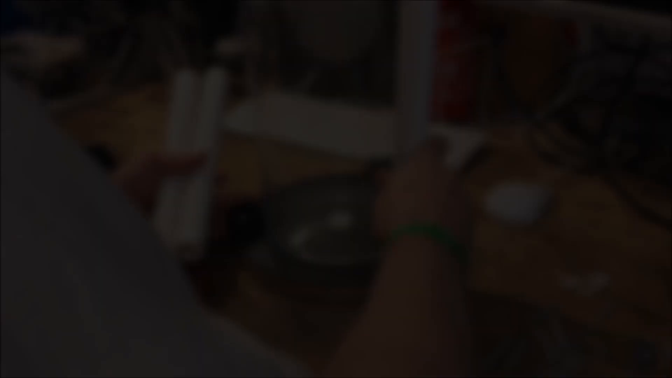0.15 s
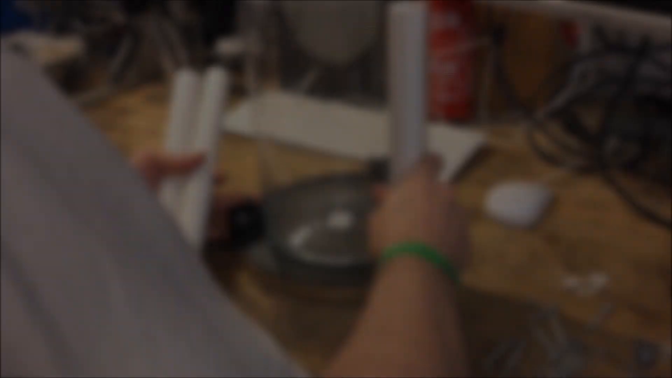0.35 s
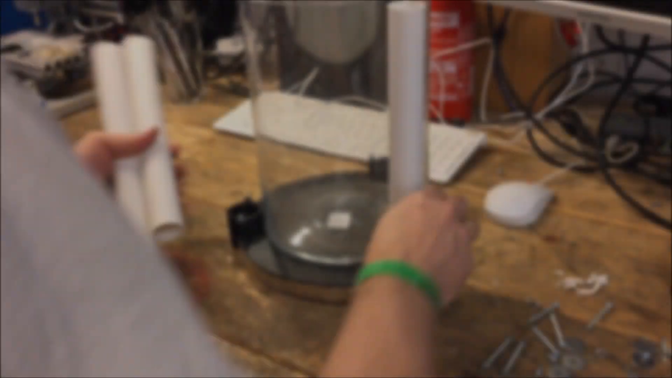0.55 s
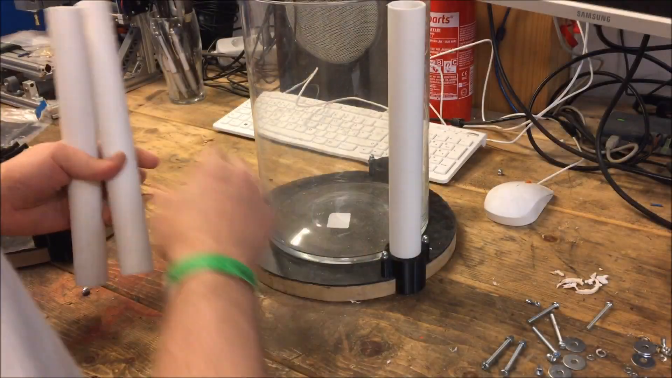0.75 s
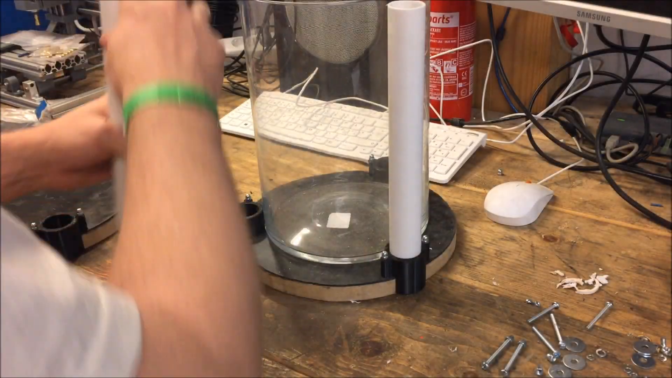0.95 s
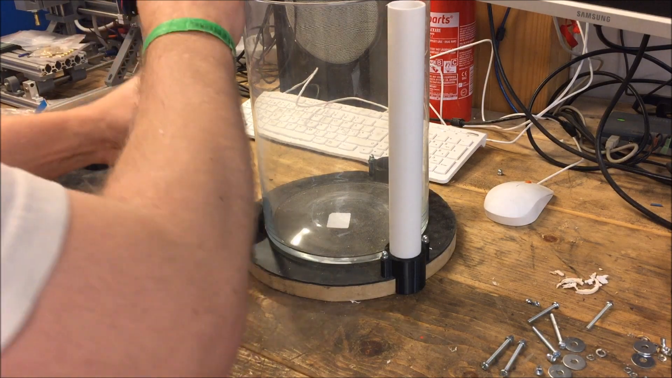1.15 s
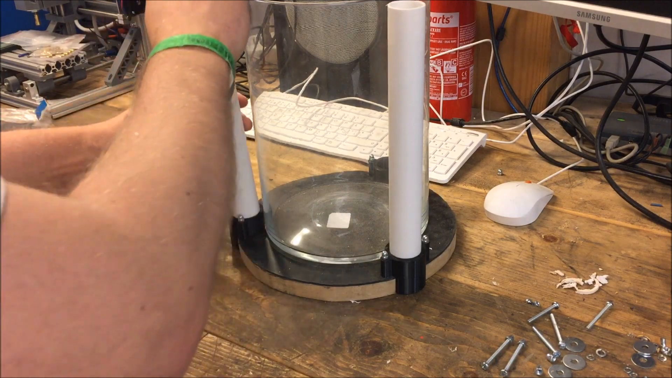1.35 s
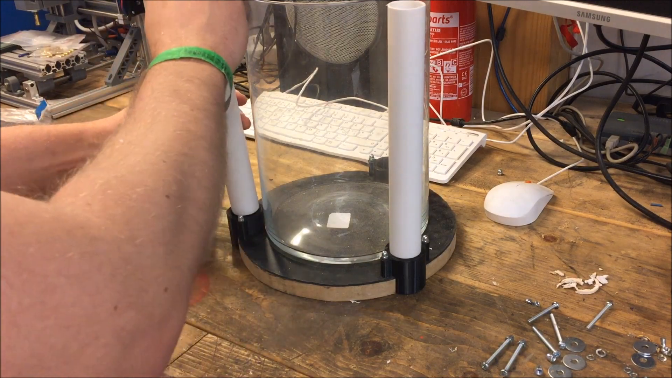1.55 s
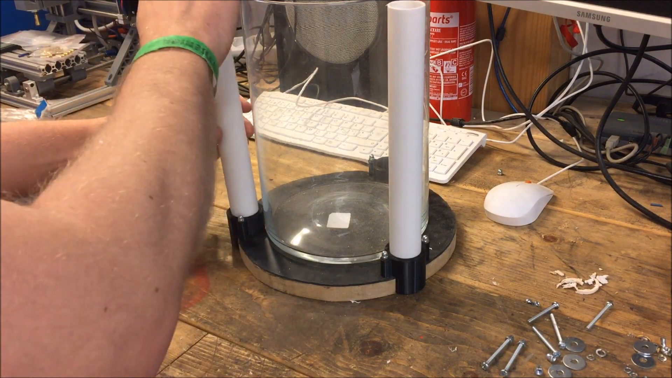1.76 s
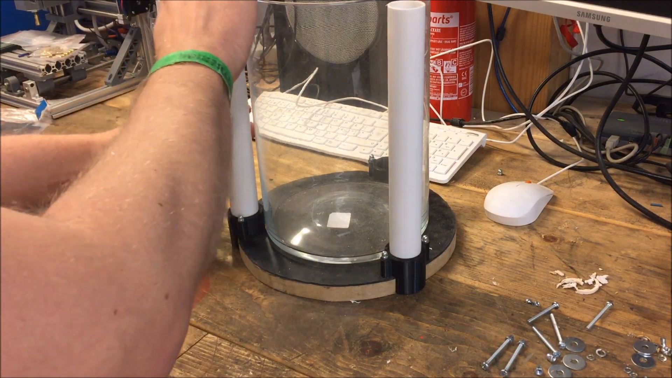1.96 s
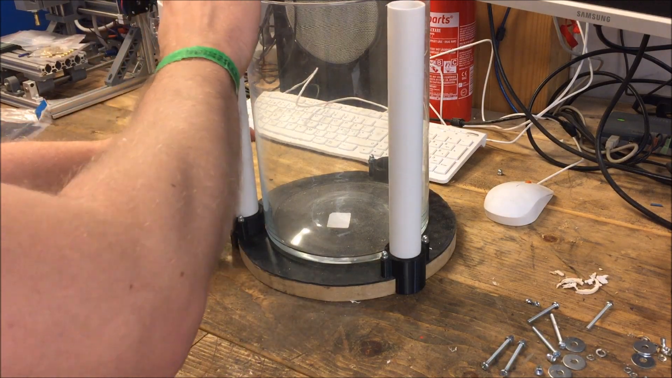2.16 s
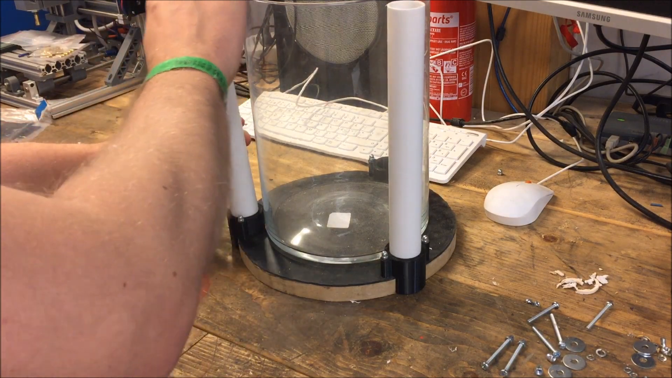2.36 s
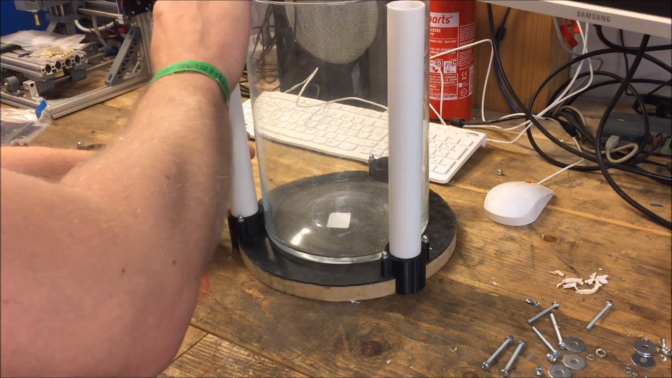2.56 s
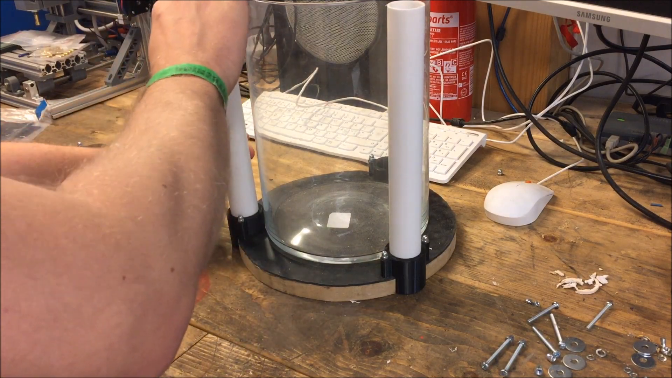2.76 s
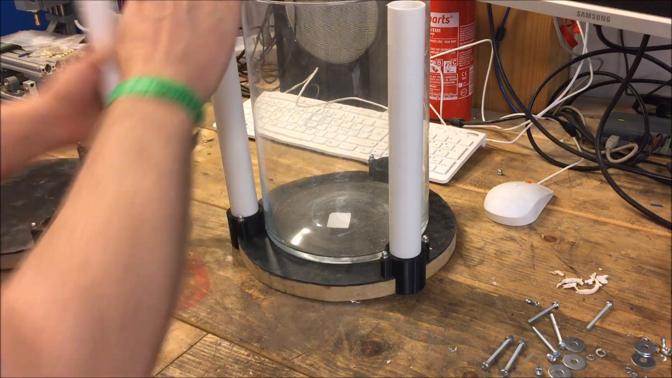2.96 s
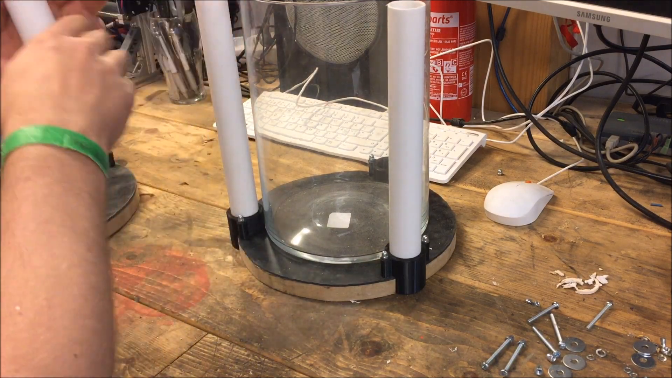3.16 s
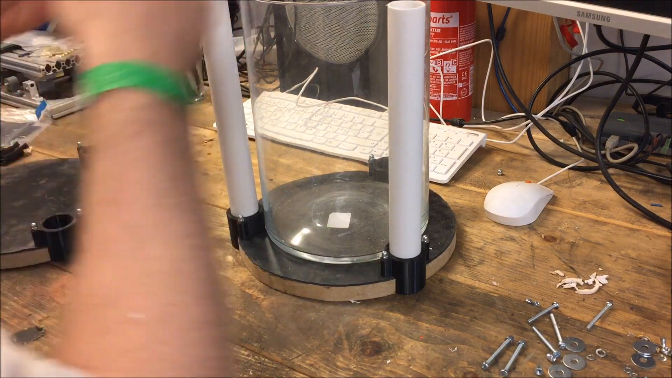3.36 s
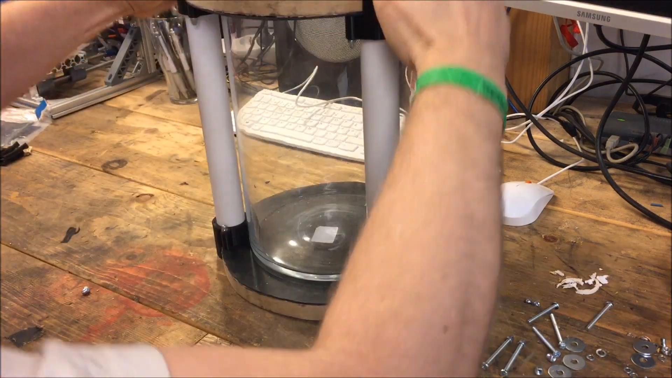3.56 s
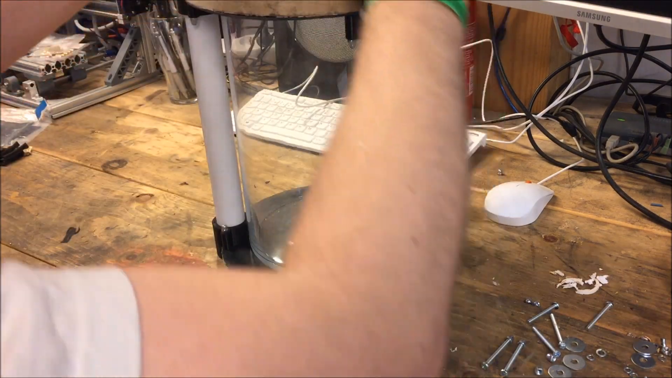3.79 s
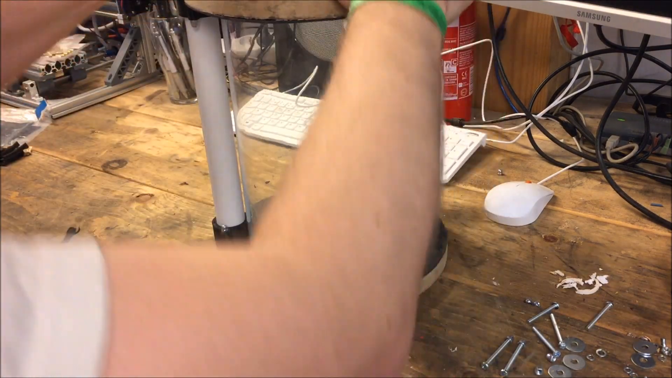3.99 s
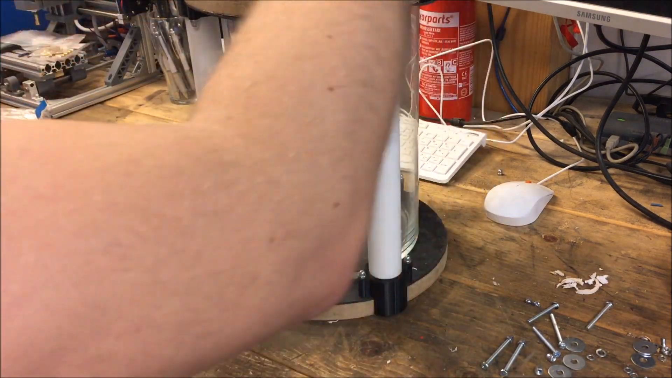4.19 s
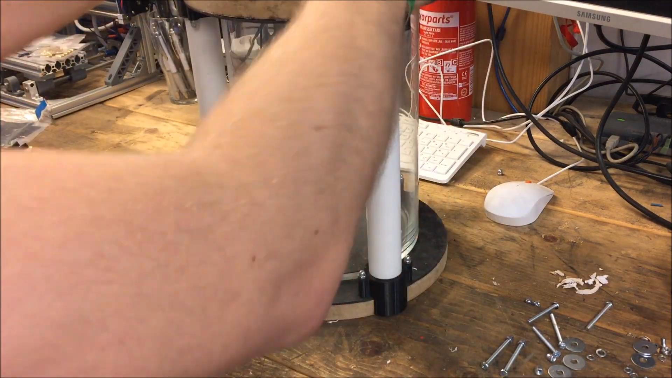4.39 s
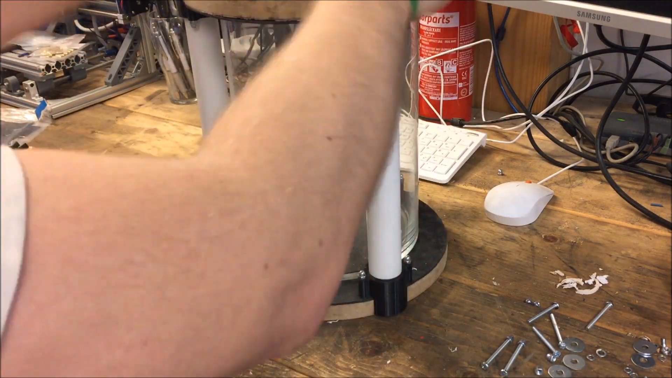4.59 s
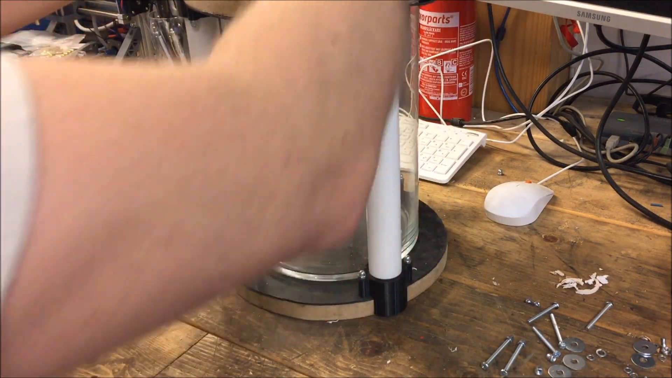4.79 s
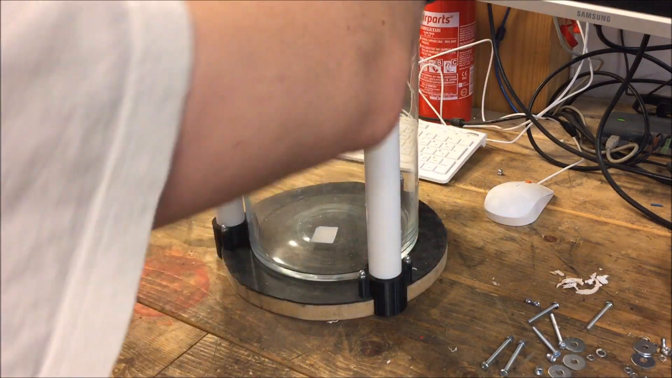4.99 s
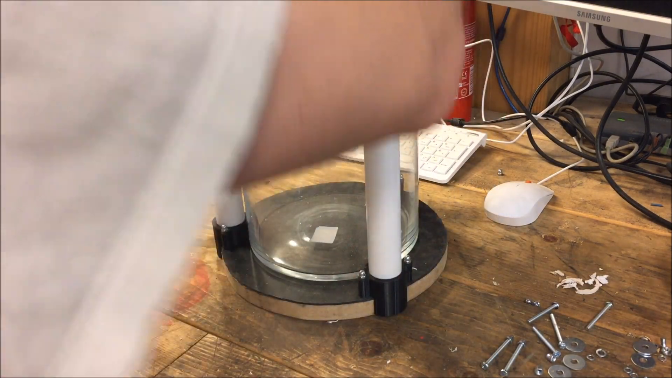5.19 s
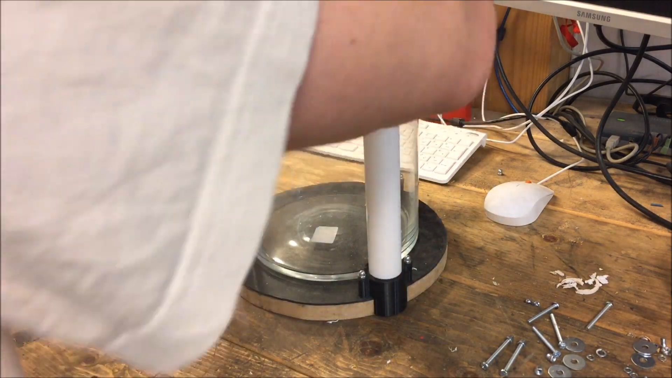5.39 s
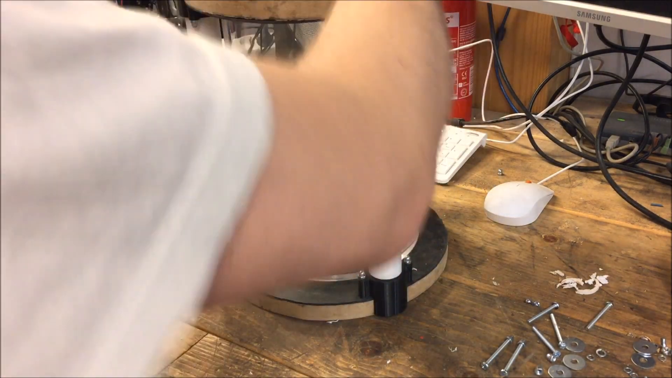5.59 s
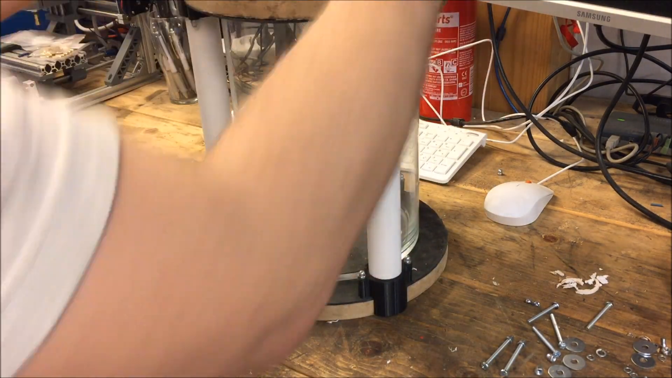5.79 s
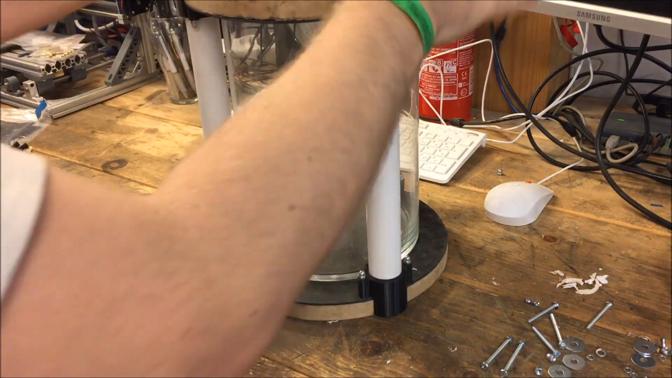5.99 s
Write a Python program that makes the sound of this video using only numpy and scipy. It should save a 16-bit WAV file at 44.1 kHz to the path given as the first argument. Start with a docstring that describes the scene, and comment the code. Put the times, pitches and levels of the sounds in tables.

```python
"""A small room with a fan running, the microphone near a workbench. Plastic pipes are pushed into
sockets on a round base that holds a glass tank; a wooden plate is then set on top and pressed home,
socket by socket. Each joint scrapes as it wedges in, snaps, and bottoms out with a knock that rings
the base or the plate; the bench booms under the shoves. In between, hands brush the plastic and
loose pipes click and ring."""
import sys
import numpy as np
from scipy import signal
from scipy.fft import rfft, irfft
from scipy.io import wavfile

SR = 44100
rng = np.random.default_rng(int(sys.argv[2]) if len(sys.argv) > 2 else 0)


def transcribe(signal):
    """Save signal, clipped to [-1, 1], as a 16-bit WAV file at the path in sys.argv[1]."""
    frames = np.atleast_2d(signal).T
    limited = np.clip(frames, -1, 1)
    pcm = np.round(limited * 32767).astype(np.int16)
    wavfile.write(sys.argv[1], SR, pcm)


N = 266319
RING_T = np.arange(int(.6 * SR)) / SR  # time axis of one ringing sound, in seconds


def amp(db):
    """Decibels to gain."""
    return 10 ** (np.asarray(db) / 20)


def unit(x):
    """Scales to rms 1."""
    return x / np.sqrt(np.mean(x ** 2) + 1e-20)


def read(points, hz):
    """Joins points by straight lines on a log-frequency axis."""
    point_hz, value = np.transpose(points)
    return np.interp(np.log(hz + 1), np.log(point_hz + 1), value)


def add(mix, start_s, sound):
    """Adds a sound to the mix at start_s."""
    part = mix[max(round(start_s * SR), 0):][:len(sound)]
    part += sound[:len(part)]


def cut(x, hz, kind, order=2):
    """Causal low-pass or high-pass."""
    return signal.sosfilt(signal.butter(order, min(hz, .47 * SR), kind, fs=SR, output="sos"), x)


def colour(x, spectrum):
    """Shapes a sound by a curve of (freq_hz, level_db) points."""
    gain = amp(read(spectrum, np.fft.rfftfreq(len(x), 1 / SR)))
    return irfft(rfft(x) * gain, len(x))


def drift(rate_hz):
    """Slow random wander of rms 1."""
    return unit(cut(rng.standard_normal(N), rate_hz, "low"))


def fade(t60_s):
    """Exponential decay, 60 dB down after t60_s."""
    return np.exp(-np.log(1000) * RING_T / t60_s)


def ring(modes):
    """Free vibration of a body: a blow starts all its modes together."""
    return sum(amp(db) * fade(t60) * np.cos(2 * np.pi * hz * RING_T) for hz, db, t60 in modes)


# Reflections off the bench top and shelves: delay_s, level_db
NEAR_ECHOES = [(.0023, -20), (.0041, -17), (.0068, -18), (.0097, -20), (0.017, -24)]
# Decay of the room: freq_hz, t60_s
ROOM_DECAY = [(80, 0.74), (250, 0.31), (700, 0.42), (2000, 0.43), (5000, 0.31), (9000, 0.32), (15000, 0.3)]
# What the walls return: freq_hz, level_db
WALL_COLOUR = [(60, 0.5), (150, 2.5), (400, -1), (1000, -2.5), (3000, -2), (7000, -9.5), (15000, -9.5)]
def room(x, tail_db, onset_s=0.0075):
    """Near surfaces answer the microphone first; then a diffuse tail dies band by band."""
    near = x.copy()
    for delay_s, db in NEAR_ECHOES:
        add(near, delay_s, amp(db) * x)
    hz, t, bands = signal.stft(rng.standard_normal(len(RING_T)), SR, nperseg=256)
    bands *= np.exp(-np.log(1000) * t / read(ROOM_DECAY, hz)[:, None])
    tail = signal.istft(bands, SR, nperseg=256)[1][:len(RING_T)]
    tail *= 1 - np.exp(-(RING_T / onset_s) ** 2)
    tail = colour(tail / np.linalg.norm(tail), WALL_COLOUR)[:SR // 2]
    return near + amp(tail_db) * signal.fftconvolve(x, tail)[:N]


# Colour of the fan and room air: freq_hz, level_db
AIR_COLOUR = [(25, -22), (72, 3.5), (108, -8), (130, -10), (420, -14.5), (550, -24.5), (680, -11),
              (750, -24), (850, -16), (1300, -19.5), (1950, -8), (2700, -19.5), (5000, -34.5),
              (16000, -50.5)]
# The fan's hum lines: pitch_hz, rms_db
FAN_HUM = [(71, -55.5), (101.5, -52.5), (405, -63.5)]
def fan(air_db=-50.5, flutter_db=0.62, waver=0.26, wander_rad=0.99):
    """The room tone: faintly fluttering air and a few wavering hum lines."""
    t = np.arange(N) / SR
    hum = np.zeros(N)
    for hz, db in FAN_HUM:
        level = amp(db) * np.sqrt(2) * (1 + waver * drift(3.7))
        hum += level * np.sin(2 * np.pi * hz * t + wander_rad * drift(1.9))
    flutter = amp(air_db + flutter_db * drift(23.0))
    return flutter * unit(colour(rng.standard_normal(N), AIR_COLOUR)) + hum


# A hand brushes along a pipe: start_s, length_s, level_db
HAND_STROKES = [(0.579, 0.17, -57), (.75, 0.094, -66), (0.877, 0.11, -63), (1.041, .06, -56.5),
                (1.036, 0.44, -65), (2.883, 0.42, -65.5), (3.31, 0.044, -50), (3.39, 0.13, -59)]
# Colour of skin on plastic: freq_hz, level_db
SKIN_COLOUR = [(2000, -5), (5000, -1.5), (9000, 2), (13500, 4), (16000, 2), (17000, -18)]
def hands(level_db=-3, flutter_db=3, catch_size=1.1, catches_per_s=1200, skew=0.75):
    """Skin hisses faintly over smooth plastic, catching as it goes."""
    strokes = np.zeros(N)
    for start_s, length_s, db in HAND_STROKES:
        progress = np.linspace(0, 1, round(length_s * SR)) ** skew  # swells faster than it fades
        add(strokes, start_s, amp(db) * np.sin(np.pi * progress) ** 2)
    catches = rng.exponential(catch_size, N) * (rng.random(N) < catches_per_s / SR)
    friction = colour(rng.standard_normal(N) * (1 + catches), SKIN_COLOUR)
    return strokes * unit(friction) * amp(level_db + flutter_db * drift(60))


def bench(pitch_hz=60, build_s=0.027, lag_s=0.0046):
    """The bench top takes up each shove over a few cycles and booms."""
    out = np.zeros(N)
    swell = RING_T / build_s * np.exp(1 - RING_T / build_s)
    boom = swell * np.sin(2 * np.pi * pitch_hz * RING_T)
    for snap_s, *_, boom_db in PIPE_PUSHES + PLATE_PUSHES:
        add(out, snap_s + lag_s, amp(boom_db) * boom)
    return out


def knocks(hits, modes, low_cut, rattle_db, rattle_t60_s, rattle_hz, spot_db):
    """Blows ring a body's main modes and a dense rattle of small ones; soft contacts lack treble."""
    out = np.zeros(N)
    for start_s, db, hardness_hz in hits:
        offsets_db = spot_db * rng.standard_normal(len(modes))  # each spot has its own mix of modes
        body = ring([(hz, level + offset, t60) for (hz, level, t60), offset in zip(modes, offsets_db)])
        burst = rng.standard_normal(len(RING_T)) * fade(rattle_t60_s)
        rattle = amp(rattle_db) * cut(burst, rattle_hz, "high")
        knock = cut(body + rattle, hardness_hz, "low", order=3)
        low_hz = low_cut if np.isscalar(low_cut) else read(low_cut, hardness_hz)
        add(out, start_s, amp(db) * cut(knock, low_hz, "high"))
    return out


# Modes of a free pipe: pitch_hz, level_db, t60_s
PIPE_MODES = [(1104, -7, .36), (1669, -16, .14), (2293, -8, .26), (2690, -10, .11), (2850, -9, .11),
              (3375, -17, .2), (3774, -18, .47), (3838, -21, .33), (4366, -17, .27), (5195, -22, .25),
              (5819, -23, .25), (6202, -19, .22), (6686, -13, .13), (6998, -19, .2), (9400, -25, .18)]
# Taps on a free pipe: start_s, level_db, hardness_hz
PIPE_TAPS = [(2.1045, -22.5, 9400), (2.195, -37.5, 3900), (3.607, -32.5, 12300)]
def free_pipes(low_cut_hz=795):
    """A free pipe is struck and rings on."""
    return knocks(PIPE_TAPS, PIPE_MODES, low_cut_hz,
                  rattle_db=-5.5, rattle_t60_s=0.13, rattle_hz=1500, spot_db=-2.5)


def slides(slips_per_s=900, slip_size=0.67, socket_share=0.82, start_db=-50, below=6.6, above=1.62):
    """Tiny slips crowd into a scrape as a pipe wedges into its socket, ending at the snap."""
    out, socket = np.zeros(N), ring(SOCKET_MODES)
    socket /= np.linalg.norm(socket)
    for snap_s, _, slide_s, slide_db, _, bright_hz, *_ in PIPE_PUSHES + PLATE_PUSHES:
        n = round(slide_s * SR)
        grit = rng.standard_normal(N)[:n]
        slips = rng.random(N)[:n] < slips_per_s / SR
        force = unit(grit * (1 + slip_size * slips)) * amp(np.linspace(start_db, slide_db, n))
        force = np.pad(force, (0, len(socket)))
        scrape = force + socket_share * signal.fftconvolve(force, socket)[:len(force)]
        scrape = cut(scrape, bright_hz / below, "high")
        add(out, snap_s - slide_s, cut(scrape, bright_hz * above, "low"))
    return out


# A loose pipe touches its socket and the base: start_s, click_db, bright_hz, knock_db, hardness_hz
PIPE_TOUCHES = [(0.346, -49, 900, -38, 905), (0.364, -31, 810, -25.5, 1010), (1.448, -56, 1300, -32.5, 404),
                (1.461, -39.5, 4170, -36.5, 437), (1.619, -28.5, 1470, -28, 1210),
                (1.6301, -31, 3900, -32, 1100), (1.72, -33, 1480, -32.5, 1120),
                (1.742, -29, 1980, -33, 825), (1.7497, -20, 1890, -27, 740), (1.944, -49, 2600, -38, 430),
                (2.1046, -14, 4450, -38, 1010), (2.111, -15.5, 3900, -34.5, 750),
                (2.627, -30, 3600, -34, 1240), (2.7021, -31, 1100, -40, 1370), (2.776, -52, 8100, -65, 900),
                (2.912, -46, 2550, -46, 700), (3.2919, -31.5, 5100, -62, 900),
                (3.595, -39, 1500, -22.5, 960), (4.732, -33.5, 2690, -39.5, 800)]
def clicks(click_above=1.98, snap_above=3.53, neutral_hz=3460, catch_dulling=0.55, catch_pitch=0.28):
    """Lists the clicks: one for a touch; for a push, a snap and then a duller, lower catch."""
    rows = []
    for start_s, db, bright_hz, _, _ in PIPE_TOUCHES:
        pitch = (bright_hz / neutral_hz) ** 0.36  # a brighter click rings the socket higher
        rows.append((start_s, db, bright_hz, click_above, pitch))
    for snap_s, settle_s, _, _, snap_db, bright_hz, pitch, catch_db, *_ in PIPE_PUSHES + PLATE_PUSHES:
        rows.append((snap_s, snap_db, bright_hz, snap_above, pitch))
        catch_hz = bright_hz * catch_dulling
        rows.append((snap_s + settle_s, catch_db, catch_hz, click_above, pitch * catch_pitch))
    return rows


# Modes of a socket: pitch_hz, level_db, t60_s
SOCKET_MODES = [(920, -16, 0.01), (1190, -30, 0.004), (1265, 5, 0.0077), (1988, -5.5, 0.026),
                (2400, -5, 0.019), (3380, -7, 0.035), (3870, -35, 0.039), (5970, -25, 0.018),
                (7000, -28, .011), (8000, -51.5, 0.0084), (11300, -3, 0.0026), (14000, 6, .004)]
def snaps(socket_db=-8, crack_db=-4, crack_t60_s=0.015, slip_s=0.001072, slip_db=-2, below=1.85):
    """A sharp crack; the socket rings as the joint breaks free and again as it catches."""
    cracks, notes = np.zeros((2, N))
    for start_s, db, bright_hz, above, pitch in clicks():
        crack = amp(crack_db) * rng.standard_normal(len(RING_T)) * fade(crack_t60_s)
        socket = amp(socket_db) * ring([(hz * pitch, level, t60) for hz, level, t60 in SOCKET_MODES])
        both = cut(np.array([crack, socket]), bright_hz / below, "high")
        crack, socket = amp(db) * cut(both, bright_hz * above, "low")
        add(cracks, start_s, crack)
        add(notes, start_s, socket)
        add(notes, start_s + slip_s, amp(slip_db) * socket)
    return cracks, notes


def blows(pushes, lag_s=0.002492):
    """Lists the blows: just after its snap a joint knocks home, then settles with a second knock."""
    hits = []
    for snap_s, settle_s, *_, knock_db, knock_hz, settle_db, settle_hz, _ in pushes:
        home_s = snap_s + lag_s
        hits += [(home_s, knock_db, knock_hz), (home_s + settle_s, settle_db, settle_hz)]
    return hits


# Modes of the round base: pitch_hz, level_db, t60_s
BASE_MODES = [(114, -31, 0.11), (135.5, -21.5, 0.18), (189, -13, 0.11), (262, -1.5, 0.063),
              (365, 0.5, 0.031), (465, -10.5, 0.029), (596, -2, 0.025), (580, -9, 0.049), (620, -20, 0.032),
              (690, -41, 0.12), (770, -24, .04), (900, -56, 0.024)]
# A harder, more glancing contact draws less bass from the base: hardness_hz, low_cut_hz
BASE_LOW_CUT = [(450, 47), (800, 72), (1300, 1200)]
# A pipe goes into the base: snap_s, settle_s, slide_s, slide_db, snap_db, bright_hz, pitch_factor,
# catch_db, knock_db, knock_hardness_hz, settle_db, settle_hardness_hz, boom_db
PIPE_PUSHES = [(0.3905, 0.0029, 0.028, -24, -18, 3630, 1.25, -22, -17.5, 780, -26, 665, -33.5),
               (1.634, 0.0059, .025, -70, -25.5, 4350, 1.2, -19, -37, 1026, -25, 630, -43),
               (2.662, .007, 0.041, -36, -27, 3240, 1.1, -30, -16.5, 812, -23, 710, -33.5)]
def round_base():
    """The base knocks as pipes bump against it and bottom out in its sockets."""
    touches = [(start_s, db, hardness_hz) for start_s, _, _, db, hardness_hz in PIPE_TOUCHES]
    return knocks(blows(PIPE_PUSHES) + touches, BASE_MODES, BASE_LOW_CUT,
                  rattle_db=15.5, rattle_t60_s=0.047, rattle_hz=400, spot_db=4.0)


# Modes of the wooden plate: pitch_hz, level_db, t60_s
PLATE_MODES = [(118.2, -18, 0.065), (145.6, -2.5, 0.055), (192.5, -9, 0.033), (253.4, -12, 0.052),
               (298, -3, 0.017), (318, -2, 0.04), (497, -12.5, 0.028), (582, -5.5, 0.037),
               (663, -5.5, 0.042), (795, -9, 0.052), (1124, -3, 0.053), (1220, -14.5, 0.034)]
# A harder contact draws less bass from the plate: hardness_hz, low_cut_hz
PLATE_LOW_CUT = [(200, 44), (1200, 115)]
# The plate is pressed onto a pipe: columns as in PIPE_PUSHES
PLATE_PUSHES = [(3.607, 0.0045, 0.018, -20, -16.5, 2400, .89, -9.5, -7, 460, -11.5, 516, -27),
                (4.096, 0.005, 0.004, -37, -34.5, 2210, 0.85, -55, -35, 750, -38.5, 298, -37),
                (4.472, .005, 0.015, -29, -23, 2400, 0.92, -19.5, -18, 600, -51, 400, -21.5),
                (4.745, 0.0088, 0.019, -46, -29.5, 2800, 1.02, -31, -17, 154, -24, 437, -17),
                (5.1367, 0.0043, 0.0057, -17, -12.5, 2620, 0.81, -30, -30, 700, -18.5, 640, -25),
                (5.393, 0.00774, .006, -9.5, 2.5, 1843, 0.963, -25, -17.5, 1100, -22.5, 800, -19),
                (5.693, 0.0066, 0.0056, -19, -23, 3350, 1.45, -17.5, -21, 1200, -10.5, 218, -13.5),
                (6.012, 0.0062, .01, -30.5, -17, 3430, 1.13, -13.5, -27, 1200, -9, 158, -24)]
def wooden_plate():
    """The plate gives a short wooden knock as each socket bottoms out on its pipe."""
    return knocks(blows(PLATE_PUSHES), PLATE_MODES, PLATE_LOW_CUT,
                  rattle_db=17.5, rattle_t60_s=0.04, rattle_hz=480, spot_db=2.5)


def scene():
    """Everything as it reaches one microphone by the bench."""
    base, plate, pipes = round_base(), wooden_plate(), free_pipes()
    cracks, socket_notes = snaps()
    bodies = room(base, tail_db=-9) + room(plate, tail_db=-7)
    friction = room(cracks + slides() + hands(), tail_db=-4.5)
    # Sockets and pipes beam their notes forwards, so less of these comes back from the walls.
    beamed = room(socket_notes + pipes, tail_db=-16)
    return (bodies + friction + beamed + bench() + fan())[None]


def record(dry, low_cut_hz=30, top_hz=16200):
    """The microphone drops the deepest bass; peaks clip at full scale; the highest treble is cut."""
    clipped = np.clip(cut(dry, low_cut_hz, "high"), -1, 1)
    band_limit = signal.firwin(511, top_hz, window=("kaiser", 9), fs=SR)
    return signal.oaconvolve(clipped, band_limit[None], "same")


dry = scene()
out = record(dry)
transcribe(out)
```